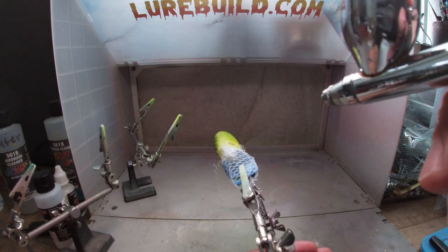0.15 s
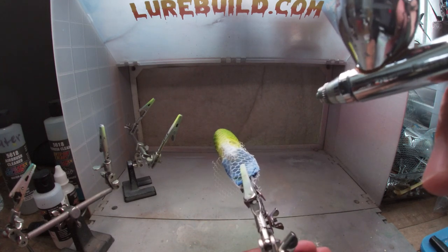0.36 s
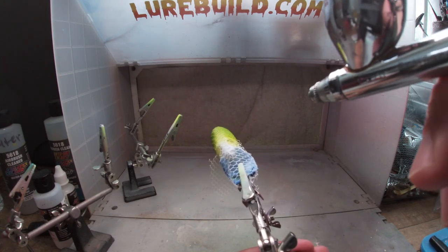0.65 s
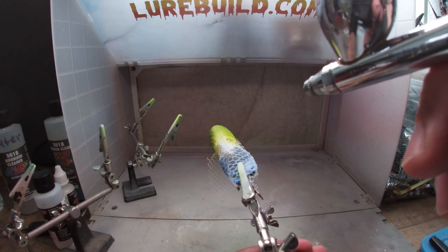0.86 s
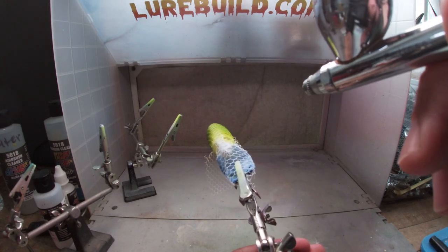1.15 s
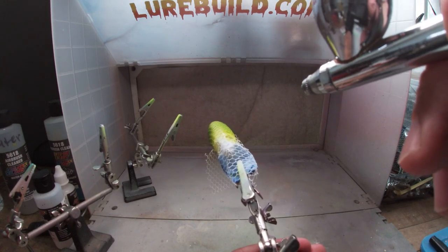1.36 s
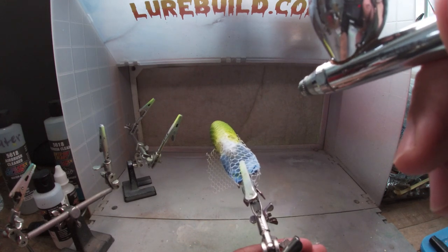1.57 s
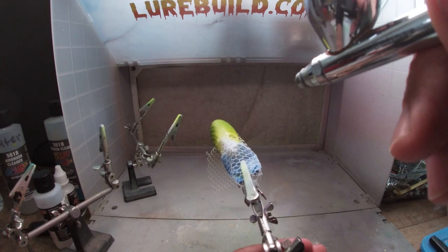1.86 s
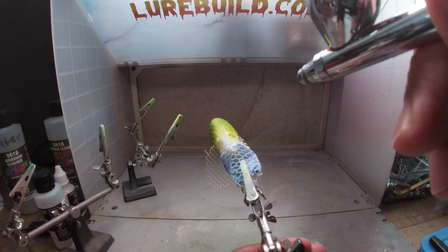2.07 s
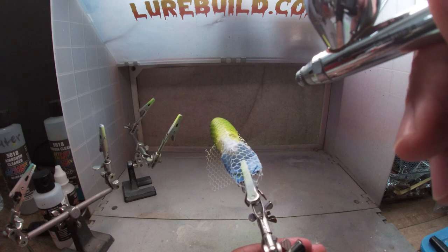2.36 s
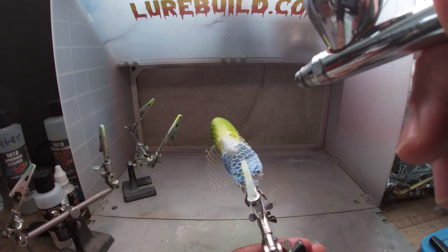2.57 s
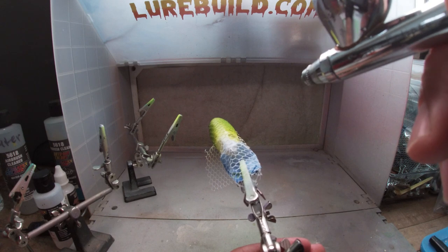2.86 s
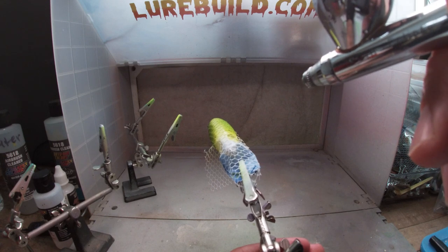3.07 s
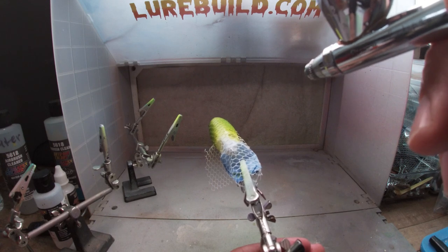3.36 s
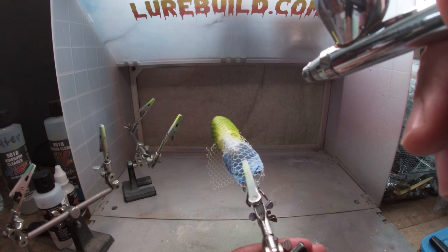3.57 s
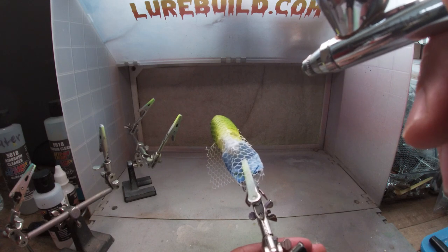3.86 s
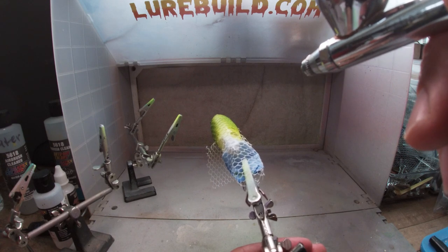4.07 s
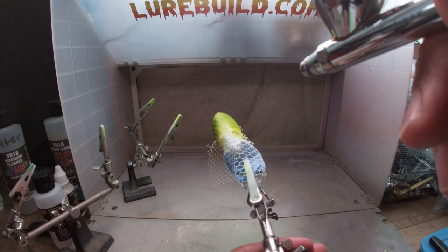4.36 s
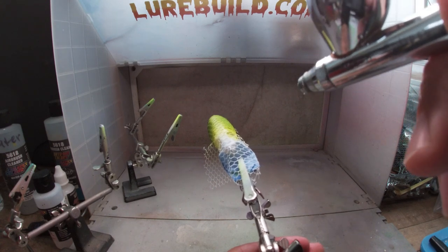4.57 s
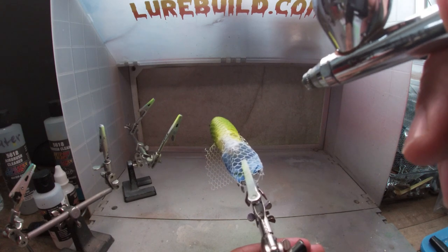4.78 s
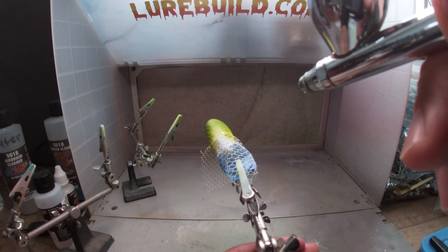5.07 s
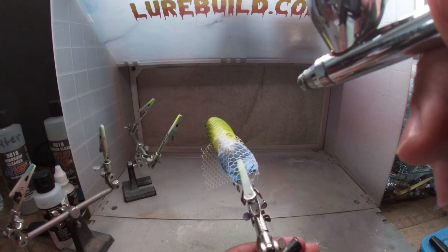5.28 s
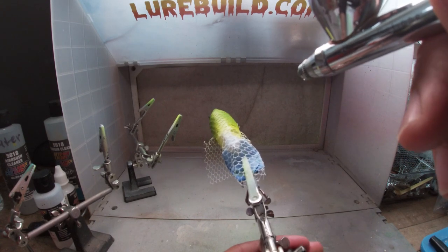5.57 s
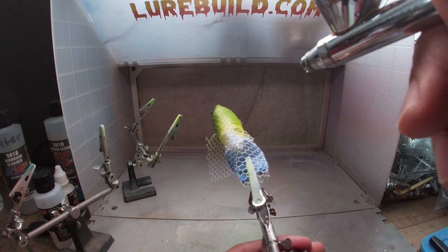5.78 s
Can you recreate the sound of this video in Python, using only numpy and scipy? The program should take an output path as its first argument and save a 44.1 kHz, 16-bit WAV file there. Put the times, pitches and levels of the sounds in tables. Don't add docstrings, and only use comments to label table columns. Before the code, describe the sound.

A steady close hiss of air, a bright snap, then a compressor chugs in a deep fast throb under faint spray bursts.

```python
import sys
import numpy as np
from scipy import signal
from scipy.io import wavfile
from scipy.ndimage import uniform_filter1d

SR = 44100
rng = np.random.default_rng(int(sys.argv[2]) if len(sys.argv) > 2 else 0)


def to_linear_factor(level_db):
    exponent = np.asarray(level_db, float) / 20
    return 10 ** exponent


def bounce(signal):
    frames = np.transpose(np.atleast_2d(signal))
    limited = np.clip(frames, -1, 1)
    pcm = np.round(limited * 32767).astype(np.int16)
    wavfile.write(sys.argv[1], SR, pcm)


N = 261380
T = np.arange(N) / SR

# frequency in Hz, level in dB.
JET = [(200, -43), (500, -13.5), (1100, -12), (1300, -5.5), (2000, -4.5), (3200, 0), (5200, -2.5),
       (8200, -1.5), (10500, -2), (11200, -9.5), (12000, -10.5), (13800, -16.5), (15700, -28)]
# frequency in Hz, level in dB.
SPRAY = [(1500, -35), (2500, -9.5), (4000, -5.5), (5500, -9.5), (6800, -5.5), (7500, 0), (8700, 0.5),
         (9500, -9.5), (10500, -9), (11200, -21), (13000, -20), (15700, -36)]
# centre in Hz, width in Hz, height in dB.
BOOTH = [(784, 170, 6), (1265, 57, 8.5), (3276, 330, -6.5), (5170, 57, 7), (5530, 100, 2), (6030, 250, 5),
         (7360, 100, 6), (8050, 650, 4.5), (8580, 620, 4), (9320, 330, -5), (10070, 270, 5.5),
         (11750, 300, -1.5), (12500, 300, -1), (13800, 400, 1)]
# start in seconds, opening time in seconds, shut at in seconds,
# spray level in dB.
PULLS = [(1.05, .3, 1.87, -49.5), (1.5, .6, 3.42, -47.5), (3.41, .07, 3.54, -43.5), (3.66, .1, 3.815, -44),
         (3.995, .025, 4.055, -44), (4.17, .12, 4.69, -47.5), (4.835, .03, 4.91, -44),
         (5.135, .025, 5.195, -44.5), (5.335, .035, 5.41, -44), (5.575, .03, 5.65, -45),
         (5.82, .04, 5.92, -44)]
PAINT_STOP_DB_PER_S, DRIBBLE_DB = 230, -73.5
AIR_ON_S, AIR_RISE_S, AIR_DB = 0.17, 0.03, -41
SURGE_DB, SURGE_END_S, SURGE_FADE_S = 2, 0.245, 0.027
DUCK_FROM_S, DUCK_S, DUCK_DB = 1.0, 0.61, -6.5

# start in turns, speed in turns/s, sag under load in turns/s2, easing in turns/s3.
CRANK = (.2623, 27.76472, -.0067644, .00016467)
# start in turns, twice the line frequency in Hz, drift in turns/s2.
MAINS = (-.1635, 119.92585, .0015373)
# mains multiple, crank angle of the push in turns, lead in turns,
# then rows of shaft order, level in dB.
STROKES = (0, .141, .472, [(1, -61.1), (2, -40.5), (3, -19.5), (4, -30.8), (5, -39.3), (6, -52.5),
           (7, -45.0), (8, -59.3), (9, -46.8), (10, -49.7), (11, -47.3), (12, -62.6), (13, -58.5),
           (15, -62.3), (16, -61.5), (17, -63.8), (18, -58.3), (21, -56.9), (22, -64.7), (23, -55.7),
           (24, -57.7)] + [(25, -62), (26, -65), (32, -56)])
PULL = (1, .937, .214, [(-2, -42.4), (-1, -23.8), (0, -40.2), (1, -45.0), (2, -49.7), (3, -47.1),
        (4, -56.1), (5, -52.3), (6, -60.5), (7, -55.5), (8, -57.3), (9, -64.6)])
SLIP = (-1, .479, .449, [(7, -49.7), (8, -42.7), (9, -39.6), (10, -55.1), (11, -53.7), (12, -51.3),
        (13, -58.9), (15, -49.7), (16, -61.0), (18, -63.3), (22, -62.1)] + [(38, -54), (39, -64)])
DOUBLE_PULL = (2, .479, .628, [(-6, -52.6), (-5, -49.3), (-4, -49.3), (-3, -56.4), (-2, -53.8), (-1, -52.6),
               (0, -60.2), (1, -59.8), (2, -55.4), (4, -63.1)])
# frequency in Hz, width in Hz.
BENCH = [(93.4, 3.2), (191.6, 3), (287.9, 21.8), (650, 10.5)]
# time in seconds, stroke lines in dB, mains lines in dB, both re steady running.
START_UP = [
    (.76, -62, -48),
    (.775, -22, -31),
    (.84, -31, -18),
    (.875, -2, 5),
    (.92, 1.5, -20),
    (.98, 1.5, -7),
    (1.02, 2.5, -1.5),
    (1.3, 0.4, 1.5),
    (2.0, 0.3, -0.1),
]
SHUDDER_DB = -48

# casing mode in Hz, crank angle in turns, mains phase of the hardest blow in turns,
# swing in dB, t60 in seconds.
KNOCKS = [(1135, .96, .95, 4, .035), (915, .54, .4, 3, .08), (1020, .86, .2, 3, .04),
          (1020, .3, .6, 2.5, .04), (1320, .99, .5, 2.5, .025), (1320, .33, .4, 1.5, .035),
          (1510, .94, .6, 2.5, .04), (1510, .22, .5, 1.5, .04), (1510, .71, .4, 1.5, .02),
          (1660, .77, .8, 1.5, .028), (1745, .78, .9, 1.5, .035), (1700, .27, .3, 2.5, .03),
          (2000, .2, .9, 1.5, .04), (2000, .53, .4, 1.5, .02), (2000, .76, .9, 1.5, .03),
          (2130, .52, .5, 3, .045), (2320, .42, .4, 4, .05), (480, .06, .3, 6, .06),
          (3300, .88, .2, 3, .008)]
KNOCK_DB = [-1, -1.5, -6.5, -9, -10, -6.5, -10.5, -11.5, -9, -8.5, -16, -8, -10, -22, -15, -10, -14.5,
            -19.5, -21.5]
# frequency in Hz, level in dB.
WHIR = [(200, -20), (350, -6), (520, -17), (750, -17), (1000, -34.5), (1500, -11), (2200, -25.5),
        (2500, -15.5), (3500, -21.5), (5000, -46.5), (8000, -100)]
# centre in Hz, width in Hz, height in dB.
CASING = [(637, 200, 9.5), (804, 60, 17.5), (870, 33, -3), (1150, 160, 20), (1470, 100, 5),
          (1530, 190, -17), (1810, 170, 10.5), (1870, 64, 1.5), (2180, 64, 13)]
WHIR_DB = -4.5
CATCH_S, CATCH_RISE_S = 0.82, 0.04
STEADY_DB = -43
STALL_DB, CLATTER_DB = -55, -41
CLATTER_DUCK = 0.51
# casing mode in Hz, crank angle in turns, double-pull phase in turns, t60 in seconds.
SLAP = (834, .14, .17, .05)
SLAP_DB, SLAP_CHANCE = -7, 0.25
# frequency in Hz, level in dB per Hz.
RATTLE_COLOUR = [(150, -23), (220, 2), (400, -34), (560, -5), (630, -1), (740, -26), (860, 1.5), (920, 0),
                 (990, -12), (1500, -29)]
RATTLE_DB, RATTLE_UNTIL_S, RATTLE_DB_PER_S = -39, 0.87, 19

# time in seconds, peak in dB.
TRIGGER = (.2391, -20)
# time in seconds, peak in dB.
SWITCH = (.7591, -9.5)
# delay in seconds, level in dB.
SWITCH_BOUNCE = (.00098, 8)
# frequency in Hz, level in dB, t60 in seconds.
TRIGGER_MODES = [(3370, -2, 0.017), (2360, -4, .015), (5100, -3, 0.0081), (7760, 2, .008),
                 (1100, -19, 0.016)]
# frequency in Hz, level in dB, t60 in seconds.
SWITCH_MODES = [(8140, -2, 0.0094), (8670, -2.5, 0.014), (5130, -7.5, .004), (12100, -14, .004),
                (14300, -18, .003), (870, -38, 0.11)]
ECHO_FROM_S, ECHO_GAP_S, ECHO_DB, ECHO_T60_S = 0.004, 0.0011, -12, 0.22

# frequency in Hz, level in dB per Hz.
ROOM = [(15, -53), (25, -9), (69, -6), (102, -46), (136, -6), (211, 1.5), (288, -12.5), (328, -9.5),
        (566, -32), (754, -22), (1110, -45), (2490, -24.5), (3410, -40.5), (7630, -32), (12500, -54),
        (16200, -89), (22000, -120)]
ROOM_DB = -56
# frequency in Hz, level in dB per Hz.
FADING_COLOUR = [(250, -30), (320, 11), (450, -30), (800, -7), (1050, -17), (1400, 0), (1750, -10),
                 (2450, -10), (3200, -18), (8000, -36), (13000, -70)]
FADING_DB, FADING_S, FADING_FALL_DB = -59.5, 0.09, -27
EDGE_HZ = 15800


def evened(x):
    return x / np.sqrt(np.mean(x ** 2) + 1e-20)


def curve(rows, axis=1):
    rows = np.transpose(rows)
    return to_linear_factor(np.interp(T, rows[0], rows[axis], left=-120))


def ramp(start, rise):
    return np.clip((T - start) / rise, 0, 1)


def burst(start, rise, end, db, fall_db_per_s):
    return ramp(start, rise) * to_linear_factor(db - fall_db_per_s * np.maximum(T - end, 0))


def turns(rule):
    return np.polyval(rule[::-1], T)


def once_a_turn(angle):
    return np.flatnonzero(np.diff(np.floor(turns(CRANK) - angle)))


def noise(shape, patchy_db, ripples=()):
    frames, hz = N // 256 + 5, np.fft.rfftfreq(1024, 1 / SR)
    real, imaginary, patches = rng.standard_normal((frames, 513, 3)).T
    patches = uniform_filter1d(patches, 10, 0)
    patches = evened(uniform_filter1d(patches, 8, 1))
    shape_hz, shape_db = np.transpose(shape)
    db = np.interp(np.log(hz + 1), np.log(shape_hz + 1), shape_db)
    for centre, width, height in ripples:
        db = db + height / (1 + (2 * (hz - centre) / width) ** 2)
    spectra = (real + 1j * imaginary) * to_linear_factor(db[:, None] + patchy_db * patches)
    return evened(signal.istft(spectra, nperseg=1024, noverlap=768)[1][:N])


def ring(modes, size):
    t = T[:size]
    return sum(to_linear_factor(db - 60 * t / t60) * np.sin(2 * np.pi * hz * t) for hz, db, t60 in modes)


def airbrush():
    surge_db = SURGE_DB * (1 - ramp(SURGE_END_S, SURGE_FADE_S))
    duck_db = DUCK_DB * ramp(DUCK_FROM_S, DUCK_S)
    air = ramp(AIR_ON_S, AIR_RISE_S) ** 2 * to_linear_factor(AIR_DB + surge_db + duck_db)
    paint = np.max([burst(*pull, PAINT_STOP_DB_PER_S) for pull in PULLS], axis=0)
    paint = paint + to_linear_factor(DRIBBLE_DB) * (T > PULLS[0][0])
    return air * noise(JET, 0.94, BOOTH) + paint * noise(SPRAY, 1.0, BOOTH)


def casing():
    running = to_linear_factor(CLATTER_DB + CLATTER_DUCK * DUCK_DB * ramp(DUCK_FROM_S, DUCK_S))
    return to_linear_factor(STALL_DB) * ramp(SWITCH[0], 0.02) + running * ramp(CATCH_S, CATCH_RISE_S)


def hum():
    crank, pull = turns(CRANK), turns(MAINS)
    strokes, mains, high = layers = np.zeros((3, N))
    for multiple, push, lead, orders in (STROKES, PULL, SLIP, DOUBLE_PULL):
        for order, db in orders:
            hz = order * CRANK[1] + multiple * MAINS[1]
            lag = sum(np.angle(mode ** 2 - hz ** 2 + 1j * hz * width) for mode, width in BENCH)
            angle = order * (crank - push) + multiple * pull + lead
            layer = 2 if hz > 400 else int(multiple != 0)
            layers[layer] += np.sqrt(2) * to_linear_factor(db) * np.cos(2 * np.pi * angle - lag)
    shake = signal.lfilter(*signal.iirpeak(92, 5.0, SR), rng.standard_normal(N))
    bench = curve(START_UP) * (strokes + to_linear_factor(SHUDDER_DB) * evened(shake))
    bench = bench + curve(START_UP, axis=2) * mains
    return bench + casing() / to_linear_factor(STEADY_DB) * high


def clatter():
    pull, knocks = turns(MAINS), np.zeros(N)
    for (hz, angle, hardest, swing_db, t60), db in zip(KNOCKS, KNOCK_DB):
        at = once_a_turn(angle)
        phase = 2 * np.pi * (pull[at] - hardest)
        time_chance, force_chance = rng.standard_normal((200, 2))[:len(at)].T
        shift_s = 0.00022 * np.sin(phase) + 0.00006 * time_chance
        blows = np.zeros(N + SR)
        blows[at + np.round(shift_s * SR).astype(int)] = to_linear_factor(swing_db * np.cos(phase) + 0.73 * force_chance)
        soft_onset = (1 - np.exp(-T[:6000] / t60 / 0.06)) ** 2
        body = ring([(hz, 0, t60)], size=6000) * soft_onset
        knocks += to_linear_factor(db) * evened(signal.oaconvolve(blows, body)[:N])
    whir = to_linear_factor(WHIR_DB) * noise(WHIR, 0.28, CASING)
    return casing() * to_linear_factor(-0.5) * evened(evened(knocks) + whir)


def slap():
    hz, angle, side, t60 = SLAP
    at, blows = once_a_turn(angle), np.zeros(N)
    favoured = np.cos(2 * np.pi * (2 * turns(MAINS)[at] - side))
    blows[at] = favoured + SLAP_CHANCE * rng.standard_normal(200)[:len(at)]
    body = ring([(hz, 0, t60)], size=6000) * (1 - np.exp(-T[:6000] / 0.003))
    return casing() * to_linear_factor(SLAP_DB) * evened(signal.oaconvolve(blows, body)[:N])


def rattle():
    level = burst(CATCH_S, CATCH_RISE_S, RATTLE_UNTIL_S, RATTLE_DB, RATTLE_DB_PER_S)
    return level * noise(RATTLE_COLOUR + [(4000, -90)], 1.5)


def clicks():
    stop, snaps = np.zeros((2, N))
    stop[round(TRIGGER[0] * SR)] = to_linear_factor(TRIGGER[1] - 9.0)
    place, strength = rng.random(60), rng.standard_normal(60)
    later = ECHO_FROM_S + ECHO_GAP_S * (np.arange(60) + place)
    echo_db = SWITCH[1] - 8.0 + ECHO_DB - 60 * later / ECHO_T60_S
    snaps[np.round((SWITCH[0] + later) * SR).astype(int)] = strength * to_linear_factor(echo_db)
    for delay, db in [(0, 0), SWITCH_BOUNCE]:
        snaps[round((SWITCH[0] + delay) * SR)] = to_linear_factor(SWITCH[1] - 9.0 + db)
    snap = ring(SWITCH_MODES, size=6000) * (1 - np.exp(-T[:6000] / 0.00026))
    trigger = signal.oaconvolve(stop, ring(TRIGGER_MODES, size=6000))
    return (trigger + signal.oaconvolve(snaps, snap))[:N]


def workshop():
    fading = to_linear_factor(FADING_DB + FADING_FALL_DB * (1 - np.exp(-T / FADING_S)))
    return to_linear_factor(ROOM_DB) * noise(ROOM, 1.35) + fading * noise(FADING_COLOUR, 1.5)


def scene():
    return (airbrush() + hum() + clatter() + slap() + rattle() + clicks() + workshop())[None]


def band_limit(x):
    return signal.sosfilt(signal.butter(12, 15620, fs=SR, output="sos"), x)


def record(dry):
    limited = signal.oaconvolve(dry, signal.firwin(255, EDGE_HZ, fs=SR)[None], "same")
    return band_limit(limited)


dry = scene()
out = record(dry)
bounce(out)
```